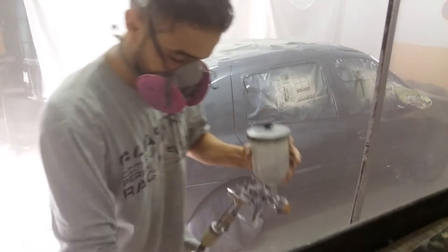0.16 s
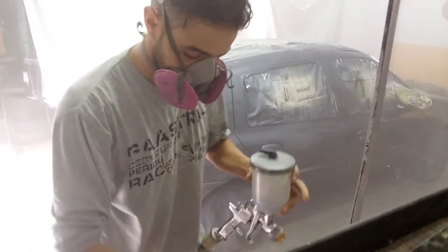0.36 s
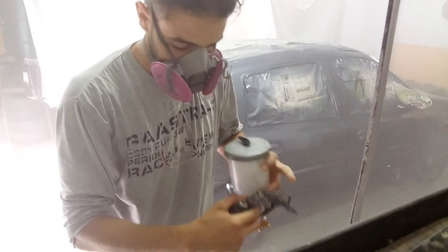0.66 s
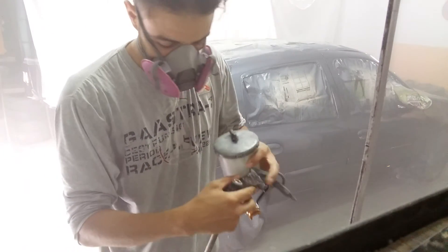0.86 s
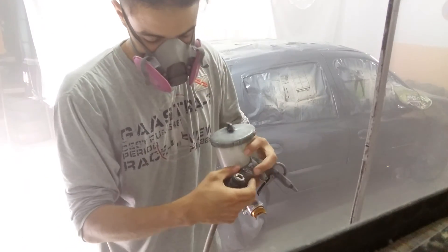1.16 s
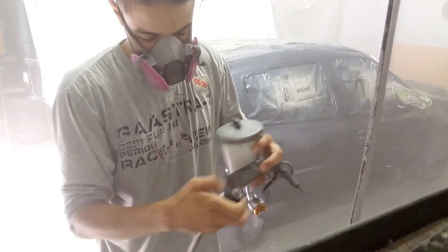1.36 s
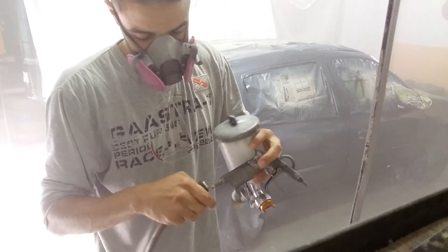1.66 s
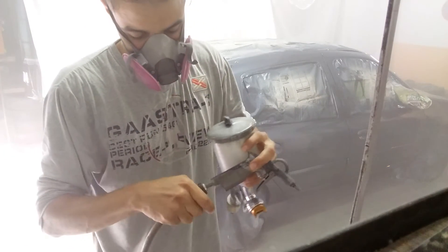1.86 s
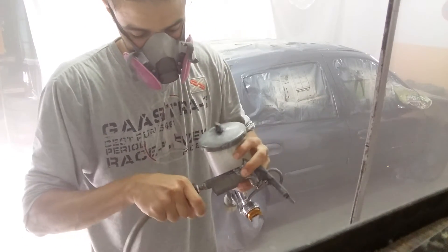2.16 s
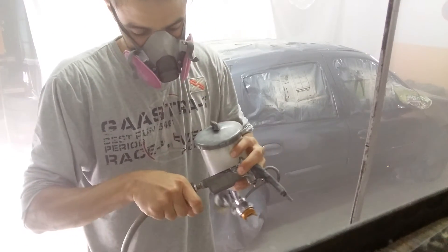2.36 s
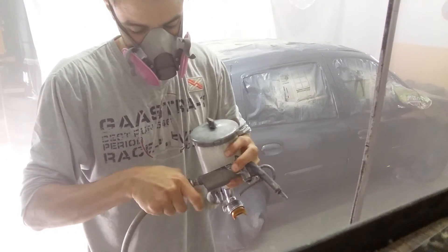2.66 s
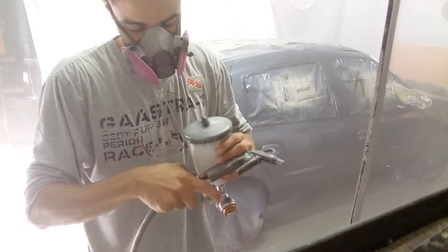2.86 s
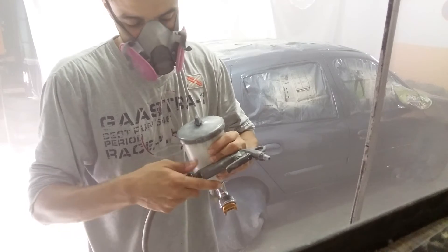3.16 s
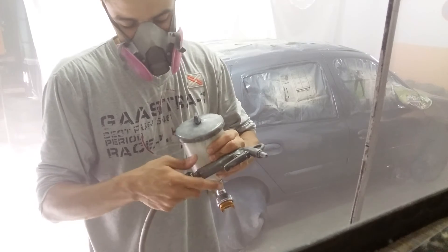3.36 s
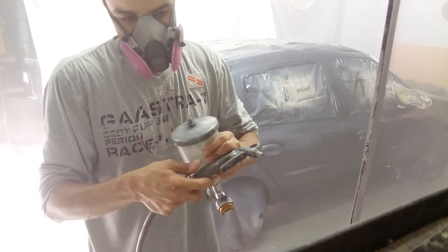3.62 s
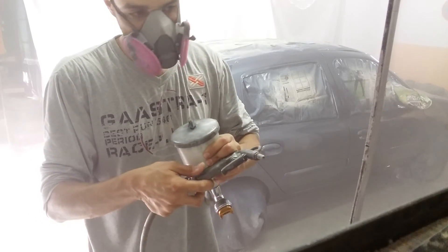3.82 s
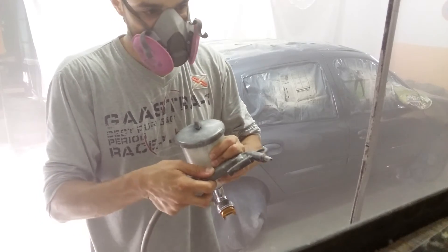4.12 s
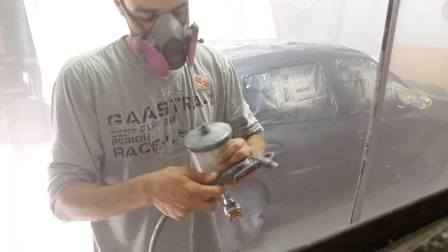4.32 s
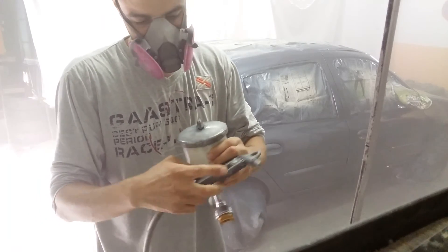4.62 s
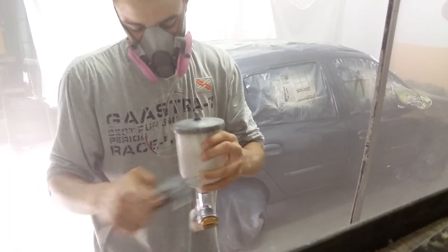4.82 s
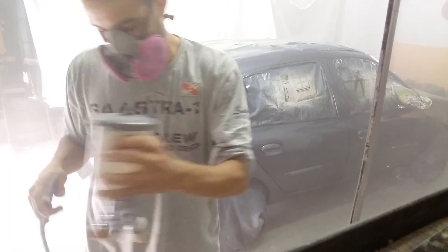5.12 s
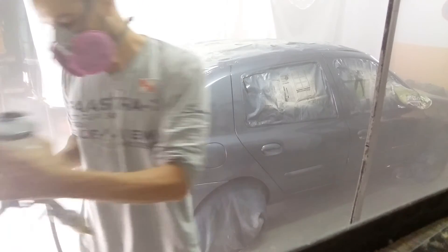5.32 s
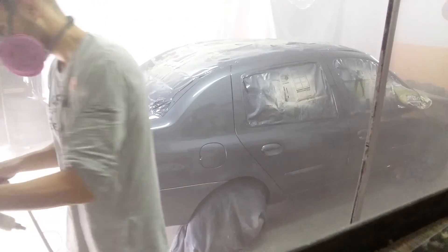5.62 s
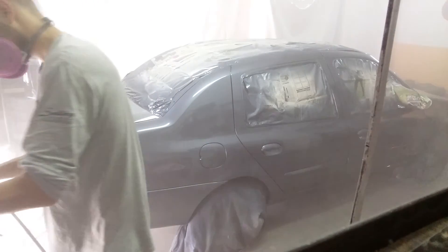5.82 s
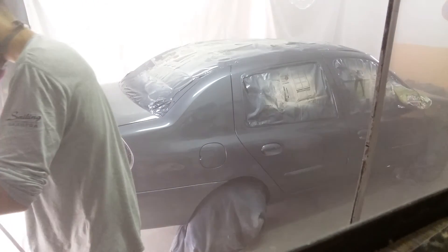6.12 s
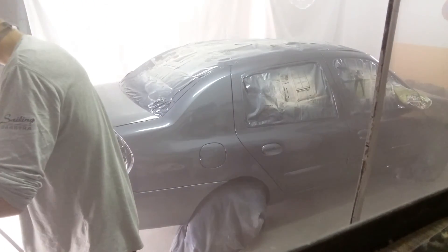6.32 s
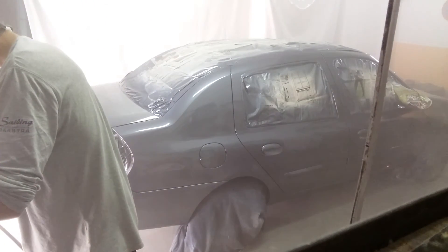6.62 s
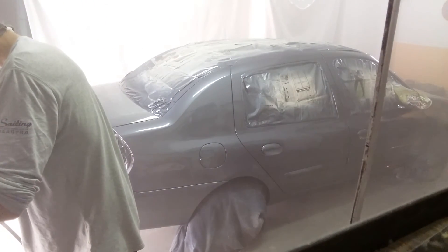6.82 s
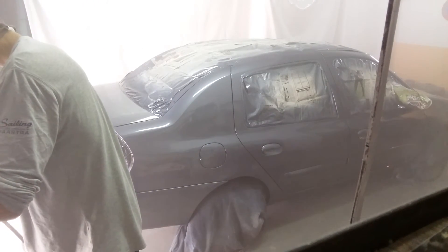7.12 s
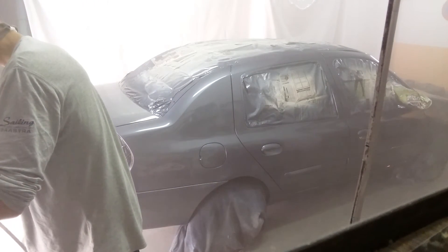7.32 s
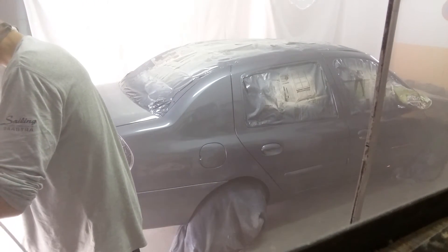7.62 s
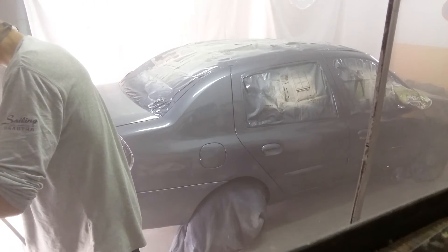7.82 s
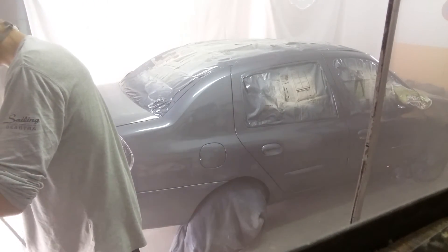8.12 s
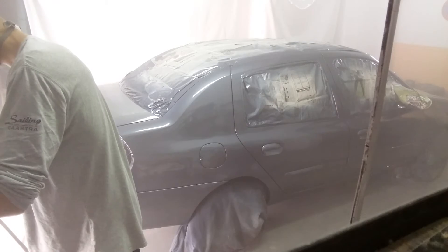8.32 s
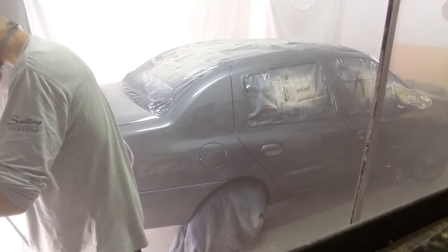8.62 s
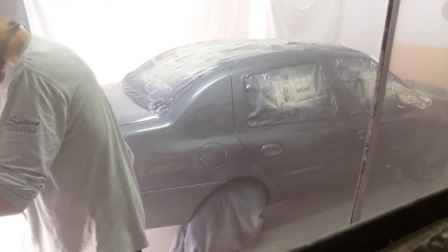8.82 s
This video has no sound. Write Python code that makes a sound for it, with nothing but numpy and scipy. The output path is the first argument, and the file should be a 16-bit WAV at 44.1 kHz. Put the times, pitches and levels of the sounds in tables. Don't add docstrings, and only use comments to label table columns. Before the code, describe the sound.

Low throbbing machine hum, small metallic ticks and a hard trigger snap with escaping air, followed by loud, gusty bursts of paint spray.

```python
import sys
import numpy as np
from scipy import signal
from scipy.fft import rfft, irfft, next_fast_len
from scipy.io import wavfile
from scipy.ndimage import uniform_filter1d

SR = 44100
rng = np.random.default_rng(int(sys.argv[2]) if len(sys.argv) > 2 else 0)


def field_ratio(decibels):
    return 10 ** (np.asarray(decibels, dtype=float) / 20)


def generate_wav(signal):
    frames = np.transpose(np.atleast_2d(signal))
    scaled = np.clip(frames, -1, 1) * 32767
    pcm = np.round(scaled).astype(np.int16)
    wavfile.write(sys.argv[1], SR, pcm)


N = 395577
T = np.arange(N) / SR

# (needle opens [s], needle shuts [s], jet level [dB])
PULLS = [
    (6.053, 6.138, -19.5),
    (6.27, 7.68, -18.5),
    (7.757, 7.818, -19),
    (7.85, 7.906, -17.5),
    (7.962, 8, -17),
    (8.05, 8.195, -25),
    (8.192, 8.256, -18.5),
    (8.25, 8.865, -20),
]
# (frequency [Hz], left minus right [dB])
ROOM_PORTS = [(60, 7), (110, -5), (200, 18), (380, 8), (700, 0), (1290, 3.5), (2380, 1.5), (4400, 0),
              (8120, 9.5), (15000, -2)]


def shape(table, hz):
    curve = np.array(table)
    return np.interp(np.log(hz + 1), np.log(curve[:, 0] + 1), curve[:, 1])


def walk(rate, size):
    hop = max(int(SR / rate / 64), 1)
    k = int(SR / rate / hop)
    held = np.repeat(rng.standard_normal(size // (k * hop) + 1), k)
    slow = uniform_filter1d(uniform_filter1d(held, k), k)
    return 1.244 * np.repeat(slow, hop)[:size]


def sides(db):
    return field_ratio(np.array([db, -np.asarray(db)]) / 2)


def add(out, start, wave):
    out[:, start:start + wave.shape[-1]] += wave


def air(spectrum, ports, size, band_db, lag=0., direct=0., echo_db=-30., lifts=(), flicker_db=1.,
        rate=12., band=(0, SR)):
    port_gap_m = 0.18
    m = next_fast_len(size)
    hz = np.arange(m // 2 + 1) * SR / m
    mid, side, jet = rfft(rng.standard_normal((3, m)))
    like = np.sinc(2 * hz * port_gap_m / 343)

    def mix(a, b):
        common = np.sqrt(1 + like) * a
        opposed = np.sqrt(1 - like) * b * np.array([[1], [-1]])
        return (common + opposed) / np.sqrt(2)

    burst = rng.standard_normal((2, 4096)) * np.exp(-np.arange(4096) / SR / 0.016)
    echoes = mix(*rfft(burst, m))
    path = np.exp(-2j * np.pi * hz / SR * np.array([[lag], [0]])) + field_ratio(echo_db) * echoes
    diffuse = mix(mid, side)
    straight = jet * path / np.sqrt(np.mean(np.abs(path) ** 2))
    both = np.sqrt(1 - direct) * diffuse + np.sqrt(direct) * straight
    lift_db = sum(db / (1 + (2 * (hz - f) / width) ** 2) for f, width, db in lifts)
    both = both * field_ratio(shape(spectrum, hz) + lift_db) * sides(shape(ports, hz))
    heard = both.mean(axis=0)[(hz >= band[0]) & (hz <= band[1])]
    both = both * m / np.sqrt(2 * np.sum(np.abs(heard) ** 2))

    out, step = 0, np.maximum(2 * np.log2(hz / 30 + 1e-9), 0)
    lowest = max(int(2 * np.log2(spectrum[0][0] / 30)), 0)
    for k in range(lowest, 19):
        part = irfft(both * np.clip(1 - np.abs(step - k), 0, 1), m)[:, :size]
        out = out + part * field_ratio(band_db(30 * 2 ** (k / 2)) + flicker_db * walk(rate, size))
    return out


def compressor():
    # (frequency [Hz], density [dB])
    drone = [(15, -45), (25, -27.5), (64, -2.5), (152, -6), (248, -18), (299, -8), (342, -12.5), (437, -11),
             (620, -7), (929, -5), (1120, -10), (1250, -4.5), (1930, -12), (3050, -16), (15800, -72)]
    drone_top = [(3500, -22.5), (4000, -23.5), (4500, -24), (5800, -26), (6800, -43), (9000, -44.5),
                 (15800, -47)]
    # (multiple of the stroke rate, level [dB])
    stroke_orders = [(2, -68), (3, -58.5), (4, -54.5), (5, -59.5), (6, -55.5), (7, -63.5), (8, -56),
                     (9, -63.5), (10, -63), (12, -61)]
    # (frequency [Hz], level [dB])
    tones = [(296.1, -53.5), (441.4, -60.5), (479.1, -62), (662.1, -73), (721.4, -63), (775.2, -60),
             (920.5, -53), (1270, -60), (1384, -56.5), (1437, -59), (1798, -61), (2046, -64), (2745, -66.5)]
    drone_db, stroke_hz = -42, 18.44
    stroke = np.cos(2 * np.pi * stroke_hz * T) + 0.23 * np.cos(4 * np.pi * stroke_hz * T)

    def shadow(hz):
        return np.interp(T, (7.5, 7.6), [0, -5.5]) * np.exp(-2 * np.log2(hz / 289) ** 2)

    def throb(hz):
        pulse = 1.6 * stroke * np.exp(-np.log2(hz / 130) ** 2 / 3)
        return shadow(hz) + pulse - 1.2 - 3.5 * np.clip(np.log2(200 / hz), 0, 1)

    out = field_ratio(drone_db) * air(drone[:-1] + drone_top, ROOM_PORTS, N, throb, lag=-12.0, direct=0.58,
                              echo_db=-28.0, flicker_db=1.03, rate=6.)
    for order, db in stroke_orders:
        wander = 1.2 * walk(2., N) + rng.standard_normal() * 1.5
        phase = 2 * np.pi * order * stroke_hz * T + wander + np.array([[.08 * order], [0]])
        out = out + np.sqrt(2) * field_ratio(db + 1.4 * walk(3., N)) * np.sin(phase)

    belt_grips_s = (3.3, 4.1)
    whine_hz = np.interp(T, belt_grips_s, (1245, 1256))
    whine_db = np.interp(T, belt_grips_s, (-61.5, -52.5))
    for hz, db in list(tones) + [(whine_hz, whine_db)]:
        phase = 2 * np.pi * np.cumsum(hz + 2.2 * walk(8., N)) / SR
        lag = rng.standard_normal() * min(np.mean(hz) / 900, .7)
        level = field_ratio(db + shadow(hz) + 1.3 * walk(7., N))
        out = out + np.sqrt(2) * level * np.sin(phase + np.array([[lag], [0]]))
    return out


def bumps():
    # (time [s], level [dB], frequency [Hz], width [Hz], length [s])
    knocks = [
        (0.023, -43.5, 119.1, 120, 0.049),
        (0.13, -38, 96, 50, 0.044),
        (0.27, -35, 550, 260, 0.048),
        (0.261, -33, 930, 400, 0.018),
        (4.406, -46.5, 440, 150, 0.033),
        (5.219, -42, 93, 60, 0.11),
        (5.652, -48, 119, 100, 0.13),
    ]
    out, t = np.zeros((2, N)), np.arange(N // 8) / SR
    for at, db, hz, width_hz, length in knocks:
        noise = rng.standard_normal((2, N // 8))
        for _ in range(3):
            noise = signal.lfilter(*signal.iirpeak(hz, hz / width_hz / 2, fs=SR), noise)
        noise = noise[0] + min(hz / 900, 1) * noise[1] * np.array([[1], [-1]])
        lead = min(at, .3)
        swell = np.exp(-((t - lead) / length) ** 2)
        add(out, int((at - lead) * SR), field_ratio(db) * noise / noise.std() * swell)
    return out


def scuffs():
    # (loudest [s], level [dB], rise [s])
    rub_times = [
        (.347, -54, .006),
        (4.589, -59, 0.14),
        (5.164, -50, .025),
        (5.385, -54.5, .02),
        (5.675, -45.5, .07),
        (5.858, -39, 0.028),
    ]
    # (frequency [Hz], density [dB])
    rub_spectrum = [(880, -25), (1500, -6), (1960, 0.5), (2120, -8), (2500, -6.5), (4060, -6.5),
                    (6020, -12), (15800, -49)]
    rise_db, fade_db_per_s, lead = 13, 94, .15
    out, u = np.zeros((2, N)), np.arange(SR // 2) / SR - lead
    rubs = air(rub_spectrum, ROOM_PORTS, len(u) * len(rub_times), lambda hz: 0, flicker_db=3.0, rate=22.0,
               band=(3000, 10000))
    for (at, db, rise), rub in zip(rub_times, np.split(rubs, len(rub_times), axis=1)):
        swell_db = np.minimum(rise_db * u / rise, -fade_db_per_s * u)
        add(out, int((at - lead) * SR), rub * field_ratio(db + swell_db))
    return out


def ring(at, hz, t60):
    t = np.arange(int(SR * t60) + 64) / SR
    contact = np.clip(t / .0008, 0, 1)
    return int(at * SR), np.sin(2 * np.pi * hz * t) * np.exp(-np.log(1000) * t / t60) * contact


def metal(modes, hits, crack_hz, crack_s):
    out, sos = np.zeros((2, N)), signal.butter(3, crack_hz, "band", fs=SR, output="sos")
    for at, db, tilt_db, crack_db, pan_db in hits:
        chance = rng.standard_normal((len(modes), 2))
        for (hz, mode_db, t60), lr in zip(modes, chance):
            start, wave = ring(at, hz, t60)
            level = field_ratio(db + 4.5 + mode_db + tilt_db * np.log2(hz / 4000) + 2 * lr)
            add(out, start, wave * (sides(pan_db) * level)[:, None])
        chatter = rng.standard_normal((2, 1500)) * np.exp(-np.arange(1500) / SR / crack_s)
        crack = signal.sosfilt(sos, chatter)
        add(out, int(at * SR), crack * field_ratio(db + crack_db) * sides(pan_db)[:, None])
    return out


def ticks():
    # (time [s], peak [dB], frequency [Hz], second frequency [Hz], left minus right [dB])
    clicks = [
        (.346, -47, 6000, 9300, 7),
        (.621, -36.5, 2200, 5400, 10),
        (0.858, -27, 2620, 4360, 0),
        (1.233, -30.5, 2620, 3900, 0),
        (2.418, -43, 4600, 5370, 1),
        (2.865, -43, 4400, 6400, 5),
        (2.887, -28, 4550, 5070, 0),
        (4.466, -44, 2040, 3020, 1),
    ]
    out = np.zeros((2, N))
    for at, db, hz, second_hz, pan_db in clicks:
        out = out + metal([(hz, -3, .006), (second_hz, -6, .005)], [(at, db, 0, 4, pan_db)],
                          crack_hz=[.55 * hz, 1.15 * second_hz], crack_s=.0025)
    return out


def coupler():
    # (frequency [Hz], level [dB], t60 [s])
    modes = [(1250, -21, .03), (2500, 2, 0.011), (2840, -7, 0.0081), (3990, 1, 0.014), (4072, -14.5, 0.31),
             (3970, -20, 0.15), (5520, -20, 0.18), (5470, -0.5, 0.015), (7900, -27, 0.03),
             (8540, -30, 0.046), (10600, -17, 0.013), (14100, -32, .06)]
    # (time [s], peak [dB], tilt [dB per octave], crack [dB], left minus right [dB])
    hits = [
        (1.9457, -26, -4, 2.5, 7),
        (1.949, -27, -5, 1, -4),
        (1.984, -24, -5, 7, 0),
        (2.012, -35, -3, -12, 1),
    ]
    return metal(modes, hits, crack_hz=[2000, 6300], crack_s=.0032)


def collar():
    # (frequency [Hz], level [dB], t60 [s])
    modes = [(4070, 0, .03)]
    # (time [s], peak [dB], tilt [dB per octave], crack [dB], left minus right [dB])
    hits = [
        (2.424, -42, 0, -20, 1),
        (2.436, -46, 0, -20, 1),
        (2.446, -40, 0, -20, 1),
    ]
    return metal(modes, hits, crack_hz=[3000, 6000], crack_s=.003)


def knob():
    # (frequency [Hz], level [dB], t60 [s])
    modes = [(4750, 3.5, 0.027), (4760, -21, 0.1), (6000, -4, 0.014), (6630, -15, 0.065), (8000, -12, .018),
             (10400, -27, 0.13), (10600, -32, .04), (11900, -30, .02), (14000, -25, .035),
             (15600, -27, .045)]
    # (time [s], peak [dB], tilt [dB per octave], crack [dB], left minus right [dB])
    hits = [
        (2.9088, -30, -13, -6, -1),
        (3.003, -43.5, 3, 7, 1),
    ]
    return metal(modes, hits, crack_hz=[1500, 10000], crack_s=.005)


def trigger():
    # (frequency [Hz], level [dB], t60 [s])
    modes = [(1230, -17, .018), (2250, -3, .006), (2700, -2, .008), (3100, -5, .006), (3700, -8, .005),
             (4700, -8, .005), (5900, -12, .004), (7500, -16, .004), (9500, -14, .004), (12500, -18, .003)]
    # (time [s], peak [dB], tilt [dB per octave], crack [dB], left minus right [dB])
    hits = [
        (4.132, -10, -0.68, 5, 0),
    ]
    return metal(modes, hits, crack_hz=[1900, 5200], crack_s=.005)


def booth(dry, wet_db=-34.0):
    # (lower frequency [Hz], t60 [s])
    decays = [(300, 0.76), (2500, 0.32), (6000, 0.55), (15000, .25)]
    t, tail = np.arange(SR // 2) / SR, 0
    tops_hz = [hz for hz, _ in decays[1:]] + [20000]
    for (hz, t60), top_hz in zip(decays, tops_hz):
        sos = signal.butter(2, [hz * .7, min(top_hz * .7, 20000)], "band", fs=SR, output="sos")
        noise = signal.sosfilt(sos, rng.standard_normal((2, len(t))))
        tail = tail + noise * np.exp(-np.log(1000) * t / t60)
    tail = tail * np.clip(t / 0.0015 - .4, 0, 1)
    return dry + field_ratio(wet_db) * signal.fftconvolve(dry.mean(axis=0)[None], tail, axes=1)[:, :N]


def blast():
    # (frequency [Hz], density [dB])
    hiss_spectrum = [(900, -12), (1800, 5), (2600, 8), (5500, -7), (9000, -18.5), (15800, -28)]
    at, db, decay_s = 4.133, -33, 0.089
    out, t = np.zeros((2, N)), np.arange(SR // 3) / SR
    hiss = air(hiss_spectrum, [(900, 0), (15000, 0)], len(t), lambda hz: 0, flicker_db=-1.0, rate=40.)
    add(out, int(at * SR), hiss * field_ratio(db) * np.exp(-t / decay_s))
    return out


def gain_db():
    creep_db_per_s, sink_db, sink_s = 1.6, 7, (7.3, 7.9)
    return -creep_db_per_s * np.maximum(T - PULLS[0][0], 0) - np.interp(T, sink_s, [0, sink_db])


def spray():
    # (frequency [Hz], density [dB])
    jet_spectrum = [(190, -29), (330, -27), (388, -20.5), (582, -16.5), (1200, -9), (1310, -6.5),
                    (1590, -10.5), (1990, -4), (2270, -9.5), (2840, -4), (3390, -2.5), (4060, -2),
                    (6380, -1.5), (7150, -6.5), (15800, -17.5)]
    # (frequency [Hz], left minus right [dB])
    jet_ports = [(300, -3), (700, 2), (1300, -1), (2400, 2.5), (3400, -2.5), (4150, -6), (4800, 4),
                 (5600, 11), (6800, 3.5), (9000, 8.5), (15000, 0)]
    # (frequency [Hz], width [Hz], lift [dB])
    standing = [(1986, 140, 3), (3650, 300, -2), (4060, 250, 6), (4400, 250, 3.5), (5100, 74, 2),
                (6230, 90, 1.5)]
    # (time [s], nozzle near the panel [-1..1], nozzle facing the camera [-1..1])
    sweep = [(6.07, 0.31, -0.25), (6.2, 0.64, 0.38), (6.3, -0.23, -0.68), (6.44, 0.91, 0.6),
             (6.56, -0.022, 0.42), (6.8, 0.13, 0.18), (6.96, -1, -0.013), (7.07, 0.23, -0.27),
             (7.22, -1.1, 0.12), (7.38, -0.41, -0.58), (7.58, 0.44, 0.4), (7.76, 0.41, 0.033),
             (8.0, -0.68, -1.1), (8.15, -0.32, 0.39), (8.27, 0.32, -0.41), (8.48, 0.46, 0.42),
             (8.72, 0.21, -0.04), (8.95, -.2, 0.21)]
    start = 6 * SR
    t = T[start:]

    open_s, release_db_per_s = 0.0086, 70.5

    def pull(on, off, db):
        return np.clip((t - on) / open_s, 0, 1) * field_ratio(db - release_db_per_s * np.maximum(t - off, 0))

    valve = np.max([pull(*row) for row in PULLS], axis=0)
    s, near, facing = np.transpose(sweep)
    near, facing = (uniform_filter1d(np.interp(t, s, c), 2500) for c in (near, facing))

    sink_db = gain_db()[start:]
    lull_db = -8.5 * np.exp(-((t - 7.85) / 0.22) ** 2)
    rumble_db = 6 * near + 0.67 * (sink_db - sink_db.mean()) + lull_db
    roar_db, shade_db = 8.5 * near, 2.5 * near
    top_db = 5.5 * facing + 0.13 * 20 * np.log10(valve / valve.mean() + 1e-3)

    def tilt(hz):
        low_db = rumble_db + (roar_db - rumble_db) * np.clip(np.log2(hz / 450) / 2, 0, 1)
        low_share = np.clip(1.7 * np.log2(5200 / hz), 0, 1)
        top_share = np.clip(2 * np.log2(hz / 6500), 0, 1)
        return low_db * low_share + top_db * top_share - shade_db

    jet = air(jet_spectrum, jet_ports, N - start, tilt, lag=18.08, direct=0.61, echo_db=-23.0, lifts=standing,
              flicker_db=1.3, rate=10.2, band=(3200, 7500))
    eddies_db = 0.85 * walk(60.55, N - start) + 0.81 * walk(400., N - start) + 0.46 * walk(16., N - start)
    pan = sides(0.7)[:, None]
    return np.pad(jet * field_ratio(eddies_db) * valve * pan, ((0, 0), (start, 0)))


def draught():
    at, db, length_s = 7.3625, -14, 0.0004
    u = (T - at) / length_s
    return field_ratio(db) * (0.68 * np.exp(-((u - 1.8) / 2.1) ** 2) - np.exp(-u ** 2))


def scene():
    handling = ticks() + coupler() + collar() + knob() + trigger()
    drone = compressor() * field_ratio(gain_db())
    return drone + bumps() + scuffs() + booth(handling) + blast() + spray() + draught()


def band_limit(x):
    return signal.sosfilt(signal.butter(12, 15830, fs=SR, output="sos"), x)


def record(dry):
    limited = np.tanh(.95 * dry) / .95
    sos = signal.ellip(10, .2, 80, 15750, fs=SR, output="sos")
    return band_limit(signal.sosfilt(sos, limited))


dry = scene()
out = record(dry)
generate_wav(out)
```